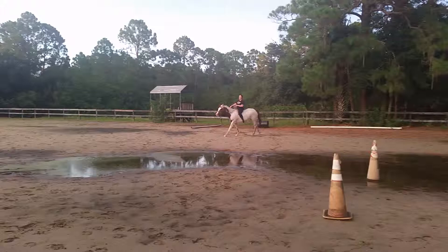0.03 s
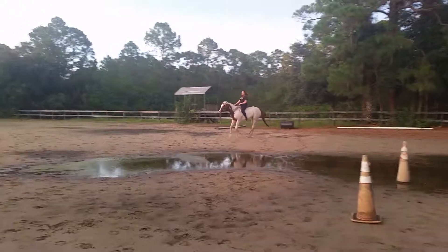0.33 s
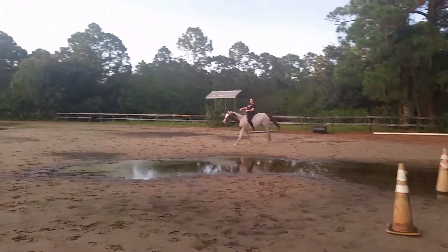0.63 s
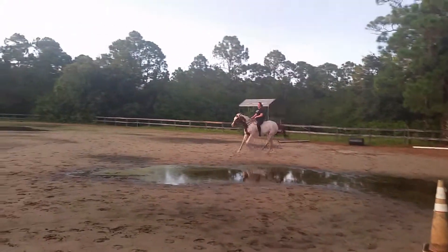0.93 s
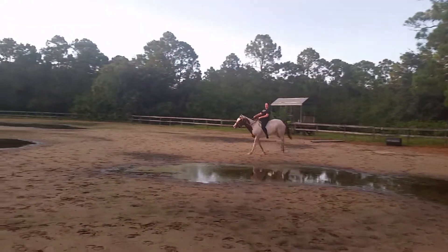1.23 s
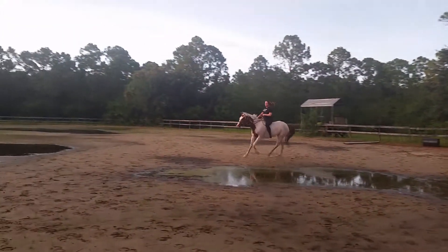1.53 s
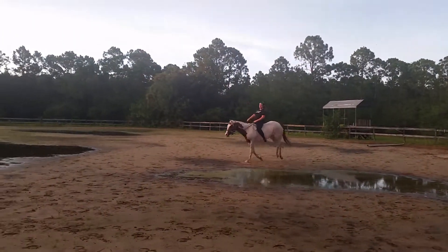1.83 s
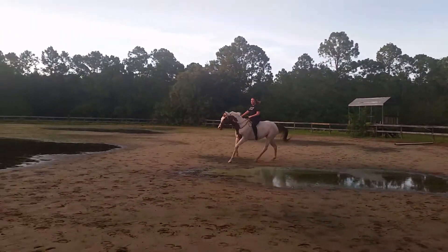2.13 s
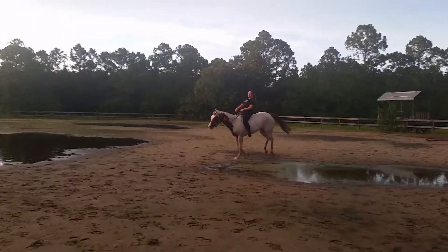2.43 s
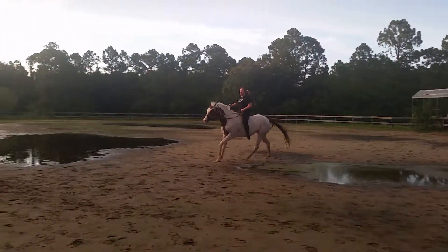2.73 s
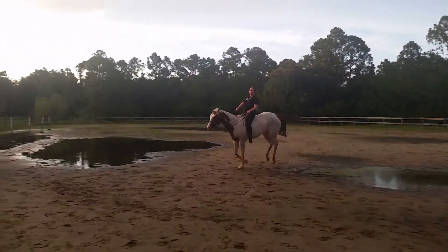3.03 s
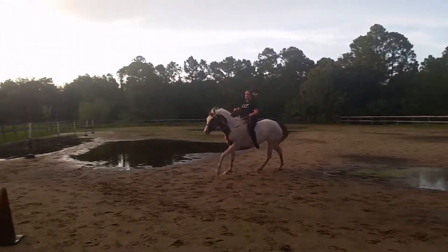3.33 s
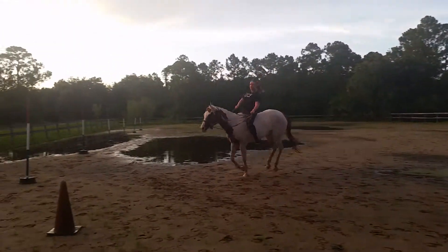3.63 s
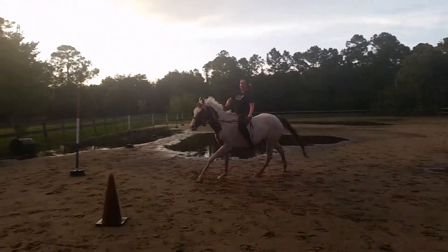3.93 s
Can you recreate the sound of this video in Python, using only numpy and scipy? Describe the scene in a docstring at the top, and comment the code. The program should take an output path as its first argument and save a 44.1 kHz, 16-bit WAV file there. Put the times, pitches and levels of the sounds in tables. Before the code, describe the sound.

Dull hoofbeats of a horse cantering closer over sand, with light tack jingle and wind.

```python
"""Hoofbeats on damp sand: a horse canters across an arena, drawing nearer to a stereo microphone.
Each hoof gives a hollow clop of trapped air, a low thud from the ground, a crunch and a spray of sand.
The bit's rings jingle with the stride, buckles click, and two soft scuffs pass between the beats.
Farther off lie a low rumble, airy wind in the trees, a thin hiss, distant insects and a faint hum."""
import sys
import numpy as np
from scipy.fft import rfft, irfft, next_fast_len
from scipy.io import wavfile
from scipy.ndimage import map_coordinates

SR = 44100
rng = np.random.default_rng(int(sys.argv[2]) if len(sys.argv) > 2 else 0)


def to_wav(sig):
    """Store sig (one row per channel, or 1-D mono) as 16-bit WAV at the path in sys.argv[1].

    Samples outside -1..1 are clipped; the rate is SR.
    """
    pcm = np.clip(np.atleast_2d(sig), -1, 1) * 32767
    pcm = np.round(pcm).astype(np.int16)
    wavfile.write(sys.argv[1], SR, pcm.T)  # frames by channels


N = 176400
TIME = np.arange(N) / SR
IMPACT_RISE_S, RING_RISE_S = 0.00046, 0.0007
CHATTER_RATE = 160  # changes a second as the rings knock against each other

# the ambience around the arena: (time [s], rumble level [dB], wind level [dB])
AMBIENCE_LEVELS = [(.08, -41, -53), (.25, -37.5, -48), (.65, -36.5, -46), (1.0, -34.5, -47),
                   (1.42, -36, -46), (1.7, -35, -47), (2.1, -35, -44.5), (2.7, -34.5, -45.5),
                   (2.9, -35.5, -46), (3.28, -35, -44.5), (3.52, -36.5, -44), (3.8, -35.5, -44.5),
                   (4, -36.5, -43.5)]


def amp(db):
    return 10 ** (np.asarray(db) / 20)


def unit(x):
    return x / np.sqrt(np.mean(x ** 2) + 1e-20)


def along(points, hz):
    """Interpolate (frequency, value) points on a log axis."""
    f, v = np.transpose(points)
    return np.interp(np.log(hz + 1), np.log(f + 1), v)


def over_time(points, column=1):
    """One column of a timed table, interpolated over the whole scene."""
    columns = np.transpose(points)
    return np.interp(TIME, columns[0], columns[column])


def wobble(rate, size=N):
    """A smooth random curve with `rate` knots a second."""
    return map_coordinates(rng.standard_normal(1000), [np.arange(size) * rate / SR], mode="wrap")


def filtered(x, response):
    """Shape x by a frequency response."""
    size = next_fast_len(N + SR // 2)
    return irfft(rfft(x, size) * response(np.fft.rfftfreq(size, 1 / SR)), size)[..., :N]


def noise(spectrum):
    """Coloured stereo noise of rms 1, near mono in the bass."""
    # likeness of the microphone's two sides: (frequency [Hz], correlation [0-1])
    likeness = [(60, 0.99), (150, 0.97), (330, 0.96), (500, 1), (800, 0.18), (1100, 0.72), (1500, 0.35),
                (2150, 0.33), (3200, 0.27), (5000, 0.055), (13000, 0.018)]

    def mid_side_gains(hz):
        angle = np.arccos(np.clip(along(likeness, hz), -1, 1)) / 2
        return amp(along(spectrum, hz)) * [np.cos(angle), np.sin(angle)]

    mid, side = filtered(rng.standard_normal((2, N)), mid_side_gains)
    return unit(np.array([mid + side, mid - side]))


def fade(t, rise, t60):
    """A smooth rise and an exponential decay, both given in seconds."""
    return (1 - np.exp(-(t / rise) ** 2)) * np.exp(-np.log(1000) * t / t60)


def add(track, s, sound):
    """Mix a sound into a track at s seconds."""
    part = track[..., round(s * SR):][..., :sound.shape[-1]]
    part += sound[..., :part.shape[-1]]


def hoofs():
    """Air trapped under the hoof pops, the ground thuds, sand crunches and scatters."""
    # hoof contacts: (time [s], clop [dB], pitch [Hz], clop t60 [s], thud [dB], crunch [dB], spray [dB])
    contacts = [(0.1862, -29.5, 640, 0.024, -28, -64, -83), (0.5099, -35.5, 573, 0.041, -28, -46.5, -68),
                (0.6296, -33, 830, 0.03, -34, -55, -79), (0.756, -28, 800, 0.011, -30.5, -45, -64),
                (1.079, -47, 610, 0.01, -30, -36.5, -77), (1.1677, -19.5, 732, 0.024, -42, -39, -70),
                (1.1839, -53, 900, 0.011, -19.5, -44, -77), (1.309, -22, 670, 0.0095, -29, -45, -68),
                (1.6430, -32, 680, 0.0094, -44, -45, -69), (1.6515, -28, 810, 0.0072, -42, -55, -79),
                (1.7245, -21, 740, 0.026, -41, -45.5, -68), (1.751, -40, 890, .012, -23, -45, -74),
                (1.8792, -18.5, 740, 0.011, -29, -39.5, -55.5), (2.192, -32, 770, .012, -31, -41.5, -60),
                (2.3105, -20.5, 690, 0.011, -18.5, -39.5, -52), (2.4425, -15, 787, 0.012, -20, -33, -56),
                (2.7683, -32, 910, 0.01, -25.5, -40, -64), (2.7735, -23, 700, 0.015, -19.5, -54, -70),
                (2.873, -27, 776, 0.016, -37, -38, -54), (2.88, -30.5, 804, 0.021, -21.5, -49, -71),
                (3.0104, -17, 763, 0.0092, -25.5, -41, -57), (3.3455, -37, 607, 0.015, -22, -39, -52.5),
                (3.4232, -22.5, 777, 0.023, -30, -44, -53), (3.4448, -24.5, 643, 0.015, -18.5, -38, -64),
                (3.915, -32.5, 790, 0.014, -23, -40.5, -63)]
    # sand crushed underfoot: (frequency [Hz], level [dB])
    crunch_spectrum = [(100, -30), (350, -3.5), (600, 18), (1000, -4.5), (1400, 3.5), (2200, 1),
                       (3000, -15), (4300, -13), (6000, -47), (15000, -52)]
    # sand thrown up: (frequency [Hz], level [dB])
    spray_spectrum = [(1000, -39), (3000, -13), (4400, -25), (5600, -17), (7500, -13), (9000, -14),
                      (13000, -4), (14500, -15), (15200, -40)]
    smack_ratio, body_hz, thud_hz, ground_hz = 1.68, 301, 96.2, 76
    clops, thuds, crunch, spray = np.zeros((4, N))
    t = np.arange(SR // 3) / SR
    cycle = 2 * np.pi * t
    for s, clop_db, hz, t60, thud_db, crunch_db, spray_db in contacts:
        pop = np.sin(cycle * hz) * fade(t, IMPACT_RISE_S, t60)
        smack = np.sin(cycle * smack_ratio * hz) * fade(t, IMPACT_RISE_S, t60=0.025)
        # the horse's weight packs the sand just after the pop
        body = np.sin(cycle * body_hz * np.exp(0.073 * rng.normal())) * fade(t, rise=0.0021, t60=0.027)
        add(clops, s, amp(clop_db) * (pop + amp(-15) * smack + amp(-13) * body))
        blow = np.cos(cycle * thud_hz) * fade(t, IMPACT_RISE_S, t60=0.07)
        # the ground shakes on after the blow
        shake = np.cos(cycle * ground_hz * np.exp(0.043 * rng.normal())) * fade(t, rise=0.02, t60=0.3)
        add(thuds, s, amp(thud_db) * (blow + amp(-15) * shake))
        add(crunch, s, amp(crunch_db) * fade(t, IMPACT_RISE_S, t60=0.059))
        add(spray, s, amp(spray_db) * fade(t, rise=0.00067, t60=0.15))
    grains = unit(amp(2.5 * wobble(240)))
    sand = grains * (crunch * noise(crunch_spectrum) + spray * noise(spray_spectrum))
    return thuds + clops + sand


def jingle(db, t60, favoured_hz):
    """One touch of the bit: the point of contact favours one ring, and each chatters in its own way."""
    # resonances of the bit's rings: (frequency [Hz], level [dB])
    modes = [(5955, -11), (6045, -14), (6885, -24), (8970, -36), (9990, -12), (11220, -1.5), (11390, -7),
             (11750, -3.5)]
    favour_db, favour_width_hz, chatter_db, scatter_hz = 8, 220, 3.5, 32
    t = np.arange(SR // 10) / SR
    hz, mode_db = np.transpose(modes)[:, :, None]
    mode_db = mode_db + favour_db * np.exp(-((hz - favoured_hz) / favour_width_hz) ** 2)
    chatter = wobble(CHATTER_RATE, size=len(modes) * len(t)).reshape(len(modes), -1)
    start_phase = rng.uniform(0, 2 * np.pi, hz.shape) + rng.normal(0, 0.5, (2, len(modes), 1))
    pitch_hz = hz + rng.normal(0, scatter_hz, hz.shape)
    phase = 2 * np.pi * pitch_hz * t + start_phase + 0.7 * chatter[::-1]
    rings = amp(db + mode_db + chatter_db * chatter) * np.sin(phase)
    softness = min(amp(-55.5 - db), 1)  # weak touches are slides that swell more slowly
    return rings.sum(axis=1) * fade(t, RING_RISE_S + 0.0043 * softness, t60)


def free_ring(t, hz, db, t60):
    """A loose ring swings free and sings on."""
    level = amp(db + 2 * wobble(86, size=len(t)))
    phase = 2 * np.pi * hz * t + 0.43 * wobble(CHATTER_RATE, size=len(t))
    return level * np.sin(phase) * fade(t, RING_RISE_S, t60)


def tack():
    """The bit's rings sound anew at every touch and rattle loosely in between; buckles click dryly."""
    # touches of the bit: (time [s], level [dB], t60 [s], favoured ring [Hz])
    touches = [(.303, -61, .06, 11200), (.748, -53, .06, 11750), (0.895, -52, 0.043, 11750),
               (1.275, -66, 0.13, 6000), (1.31, -69, 0.15, 6000), (1.454, -55, 0.078, 11750),
               (2.005, -59, 0.078, 6000), (2.243, -53, .045, 11750), (2.5047, -35.5, 0.035, 11200),
               (2.513, -43.5, 0.064, 11200), (2.599, -52.5, 0.054, 11500), (2.806, -45.5, 0.055, 11750),
               (2.823, -42, 0.067, 11670), (2.832, -47.5, 0.061, 5880), (3.095, -52, 0.12, 10000),
               (3.136, -53.5, 0.086, 6040), (3.672, -53, 0.097, 11750), (3.883, -49, .069, 11750),
               (3.898, -40, 0.071, 10000), (3.904, -39, 0.034, 11300)]
    # loose rattling of the rings: (time [s], level [dB])
    rattle_levels = [(.1, -98), (1.3, -92), (2.4, -77), (3.2, -70), (4, -76)]
    # buckle clicks: (time [s], level [dB], t60 [s])
    buckles = [(2.2979, -32, .01), (3.005, -34.5, 0.029), (3.346, -53, .02)]
    # colour of a click: (frequency [Hz], level [dB])
    click_spectrum = [(2000, -21), (6000, -7), (9000, -9), (11500, 9), (14300, 6), (15200, -16)]
    rings, clicks = np.zeros((2, N)), np.zeros(N)
    t = np.arange(SR // 3) / SR
    for s, db, t60, favoured_hz in touches:
        add(rings, s, jingle(db, t60, favoured_hz))
        add(clicks, s, amp(db - 10) * fade(t, IMPACT_RISE_S, t60=0.031))
    for s in rng.uniform(0, N / SR, size=190):
        db = np.interp(s, *np.transpose(rattle_levels)) + rng.normal(0, 1.7)
        add(rings, s, jingle(db, t60=0.1, favoured_hz=6050))
    for s, db, t60 in buckles:
        add(clicks, s, amp(db) * fade(t, IMPACT_RISE_S, t60))
    add(rings, s=3.883, sound=free_ring(t, hz=5830, db=-53, t60=0.57))
    return rings + clicks * noise(click_spectrum)


def scuffs():
    """Brief narrow-band rasps swell and die between the hoofbeats."""
    # soft rasps: (peak time [s], width [s], centre [Hz], level [dB])
    rasps = [(2.572, 0.027, 1360, -46), (3.14, 0.037, 2200, -55.5)]
    width_octaves = 0.28
    out = np.zeros((2, N))
    for s, width, centre_hz, db in rasps:
        white = rng.standard_normal((2, N))
        band = filtered(white, lambda hz: np.exp(-(np.log2((hz + 1) / centre_hz) / width_octaves) ** 2))
        swell = np.exp(-((TIME - s) / width) ** 2)
        out += amp(db) * swell * unit(band)
    return out


def rumble():
    """A low, gently wavering rumble lies under the arena."""
    # colour of the rumble: (frequency [Hz], level [dB])
    spectrum = [(15, -64), (30, -20), (40, -9), (50, -18), (66, -2.5), (84, -1), (108, -10), (142, -1.5),
                (185, -10.5), (250, -17), (400, -24.5), (800, -61), (2000, -100)]
    return amp(over_time(AMBIENCE_LEVELS, column=1) + 0.96 * wobble(12)) * noise(spectrum)


def wind():
    """Wind rushes in the trees; its sound reaches the microphone's right side first."""
    # air through the trees: (frequency [Hz], level [dB])
    spectrum = [(100, -1), (300, 1.5), (480, 0.5), (820, 3), (1050, 0.5), (1450, -6.5), (1700, -9.5),
                (2150, -13.5), (2600, -22.5), (3200, -28.5), (4000, -46), (8000, -70)]
    left_lag_s = 0.00041
    air = amp(over_time(AMBIENCE_LEVELS, column=2) + 0.4 * wobble(4.02)) * noise(spectrum)
    return filtered(air, lambda hz: np.exp(1j * np.pi * left_lag_s * np.array([-hz, hz])))


def hiss():
    """A thin hiss flickers in the high treble."""
    # rise and fall of the hiss: (time [s], level [dB])
    levels = [(.08, -70.5), (.18, -64), (.45, -63), (.55, -61), (.82, -62), (.98, -59), (1.14, -60),
              (1.4, -62.5), (1.65, -60), (2.05, -61.5), (2.35, -56), (2.74, -62.5), (2.9, -58), (3.15, -58),
              (3.3, -61.5), (3.57, -57), (3.8, -61), (4, -59.5)]
    # colour of the hiss: (frequency [Hz], level [dB])
    spectrum = [(5600, -20), (6300, -21.5), (7100, -5), (7900, -16.5), (8700, 4.5), (10300, 0), (12000, 6),
                (13200, 7.5), (14500, 0.5), (15100, -39)]
    return amp(over_time(levels) + 1.6 * wobble(25.07)) * noise(spectrum)


def insects():
    """Distant insects blend into one swelling band of noise."""
    # swell of the chorus: (time [s], level [dB])
    levels = [(.08, -77), (.25, -70.5), (.85, -67), (1.08, -65.5), (1.42, -68), (1.56, -64.5), (2.05, -66),
              (2.25, -64), (2.72, -66), (2.92, -64.5), (3.25, -66), (4, -66)]
    # the band they sing in: (frequency [Hz], level [dB])
    spectrum = [(2800, -45), (3400, -11.5), (4000, -0.5), (4600, -0.5), (5200, -7.5), (5700, -31)]
    return amp(over_time(levels) + 0.96 * wobble(20)) * noise(spectrum)


def hum():
    """One faint tone wavers in pitch and level."""
    # rise and fall of the hum: (time [s], level [dB])
    levels = [(.2, -53.5), (.7, -63), (1.8, -55), (2.0, -56.5), (2.6, -59.5), (2.94, -50.5), (3.4, -57.5),
              (3.9, -64)]
    level = amp(over_time(levels) + 0.62 * wobble(5.76))
    pitch_hz = 549 + 2.44 * wobble(11)
    return level * np.sin(2 * np.pi * np.cumsum(pitch_hz) / SR)


def scene():
    """The horse in front, the arena's ambience behind."""
    horse = hoofs() + tack() + scuffs()
    return horse + rumble() + wind() + hiss() + insects() + hum()


def record(dry):
    """The microphone opens after a moment; its two sides differ in colour and cut the highest treble."""
    # tilt between the two sides: (frequency [Hz], left minus right [dB])
    balance = [(70, -0.7), (200, 0.5), (480, 2.5), (800, 2.5), (1400, 2), (3000, 2), (3800, 4.5),
               (5000, -1), (7200, 9), (9000, 1.5), (11500, -2), (15000, -1)]
    start_s, fade_in_s, top_hz = 0.073, 0.011, 15200
    opening = np.clip((TIME - start_s) / fade_in_s, 0, 1)
    return filtered(dry * opening, lambda hz: amp(along(balance, hz) * [[.5], [-.5]]) * (hz < top_hz))


dry = scene()
out = record(dry)
to_wav(out)
```